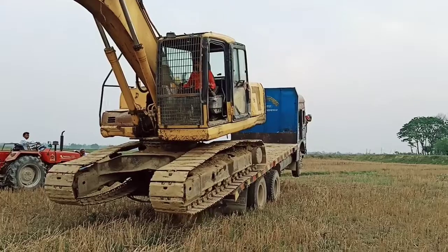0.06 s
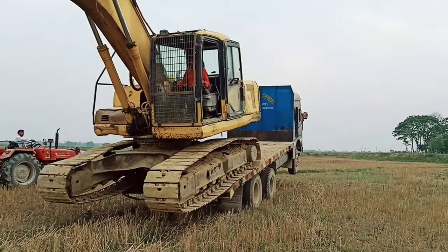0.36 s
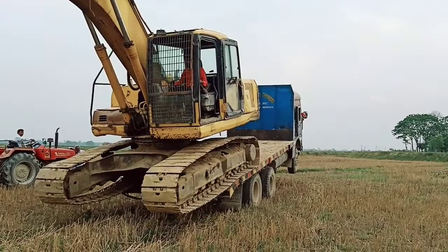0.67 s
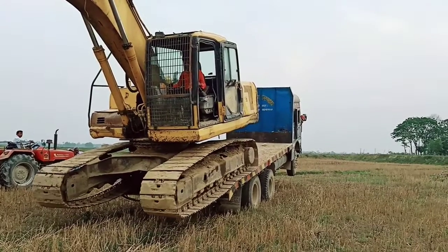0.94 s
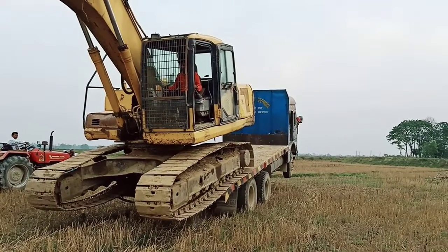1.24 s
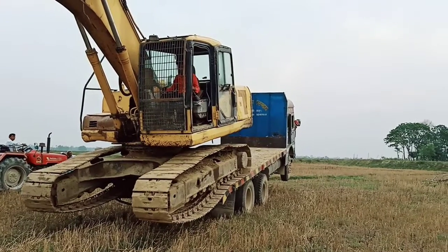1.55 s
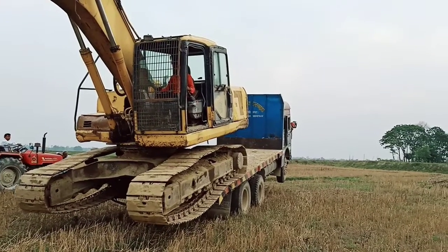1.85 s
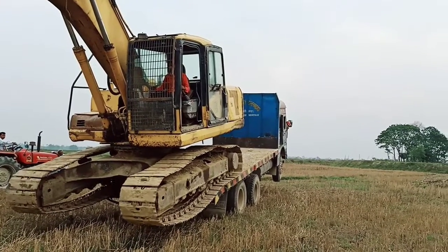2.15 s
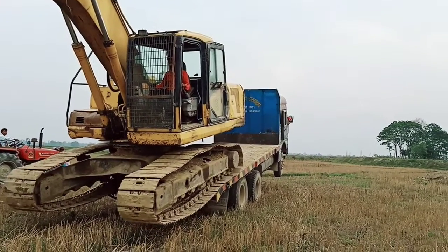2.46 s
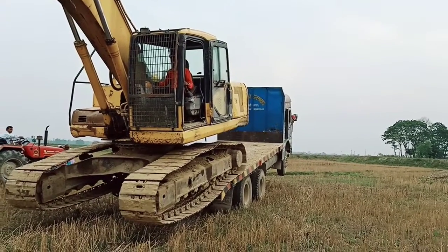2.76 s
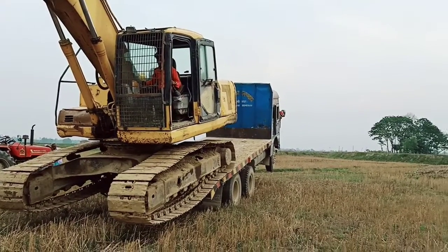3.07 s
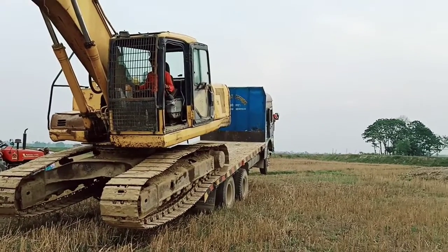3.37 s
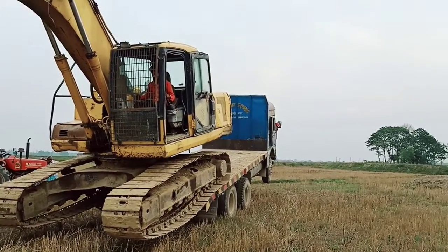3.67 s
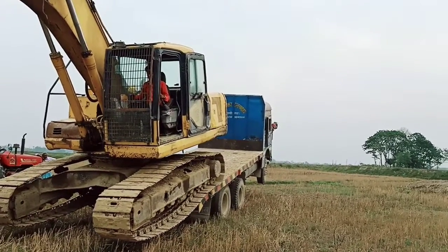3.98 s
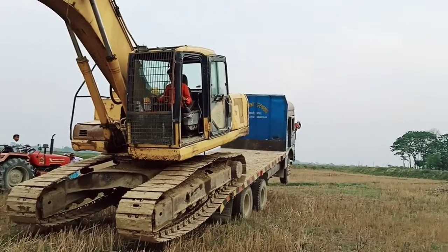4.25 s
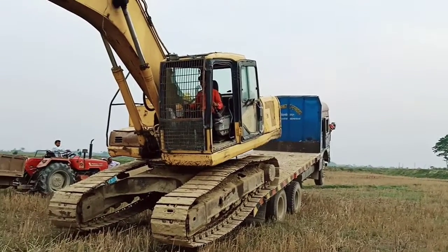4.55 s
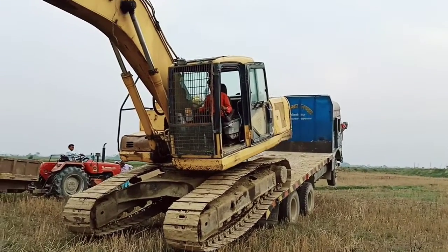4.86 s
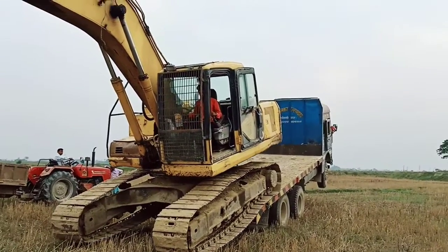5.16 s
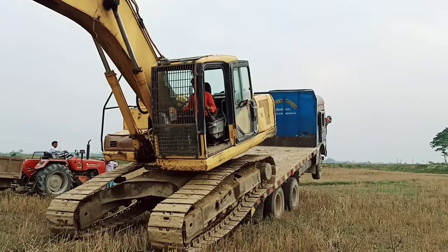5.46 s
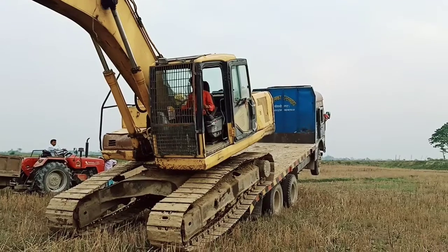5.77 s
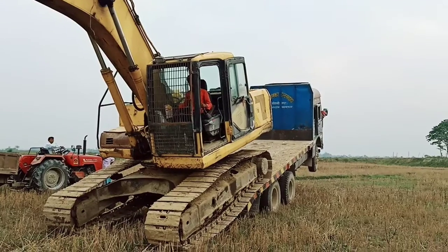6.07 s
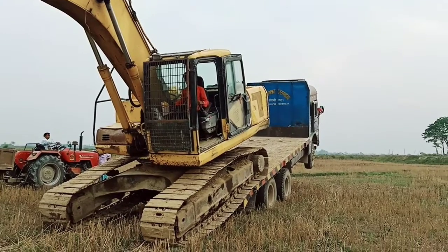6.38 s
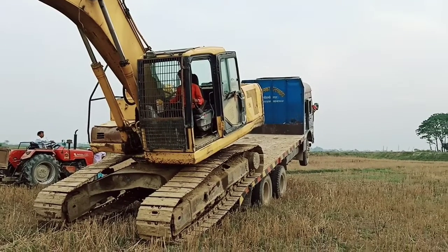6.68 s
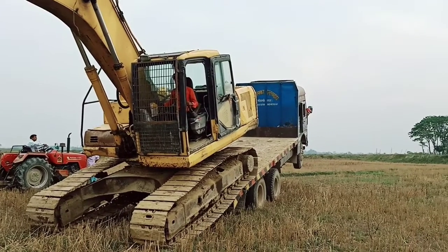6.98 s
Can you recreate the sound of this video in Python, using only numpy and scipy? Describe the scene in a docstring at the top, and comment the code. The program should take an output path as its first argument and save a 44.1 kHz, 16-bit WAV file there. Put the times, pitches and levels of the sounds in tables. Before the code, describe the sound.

A diesel excavator runs steadily with a faint hydraulic whine, a few metres away in an open field. For the first three seconds its steel tracks clank, squeak and groan over the edge of a trailer deck, which booms under the weight. Then the tracks fall quiet and the engine carries on, while dry stalks snap faintly underfoot and short puffs of wind knock on the hand-held microphone.

```python
"""Excavator creeping off a flatbed trailer

An open field, a hand-held phone a few metres from a diesel excavator standing a little to the right.
Its steel tracks grind, clank, squeak and groan over the edge of the deck, which booms under the weight.
Then it rests with the engine working and the hydraulic pump whining. Close by, dry stalks snap
underfoot and short puffs of wind knock on the two microphone ports."""
import sys
import numpy as np
from scipy import signal
from scipy.fft import rfft, irfft, next_fast_len
from scipy.io import wavfile
from scipy.ndimage import uniform_filter1d

SR = 44100
rng = np.random.default_rng(int(sys.argv[2]) if len(sys.argv) > 2 else 0)


def unload_audio(sound):
    """Save the sound as a 16-bit wav file, at the path given as the first command line argument."""
    columns = np.transpose(np.atleast_2d(sound))
    # keep every value between -1 and 1, then stretch to whole-number steps
    steps = np.round(np.clip(columns, -1, 1) * 32767)
    wavfile.write(sys.argv[1], SR, steps.astype(np.int16))


N = 309582
T = np.arange(N) / SR
BREEZE_FROM_S = 3.6

# how alike the two microphone ports hear a sound: frequency_hz, correlation
PORT_LIKENESS = [(60, 0.19), (240, 0.89), (950, 0.87), (1900, 0.14), (3800, 0.026)]
# gusts that swell and die away: centre_s, half_length_s, level_db, right_minus_left_db
WIND_GUSTS = [(4.193, 0.26, -35, -4), (4.543, 0.19, -37.5, -3.5), (5.3, .15, -43.5, 7), (6, 0.13, -36.5, 6),
              (6.892, 0.092, -37.5, 0)]
# strongest puffs on the microphone: centre_s, length_s, level_db, swing_hz, port (0 left, 1 right)
WIND_PUFFS = [(3.848, 0.013, -23.5, 210, 1), (3.883, 0.015, -24.5, 230, 1), (3.962, 0.0047, -22.5, 397, 1),
              (4.119, 0.0046, -13.5, 240, 1), (4.145, 0.013, -13.5, 496, 0), (4.173, 0.029, -22.5, 437, 0),
              (4.241, 0.017, -19.5, 383, 0), (4.278, 0.011, -19.5, 357.7, 0), (4.304, 0.023, -22, 263, 1),
              (4.364, 0.0087, -14, 237, 1), (4.435, 0.011, -21, 160, 0), (4.464, 0.011, -17, 230, 1),
              (4.537, 0.011, -25, 278, 0), (4.567, 0.0051, -24, 520, 1), (4.619, 0.007, -21, 190, 1),
              (4.674, 0.0044, -13.5, 458, 1), (4.74, 0.0088, -17.5, 203, 1), (4.986, 0.011, -12.5, 255, 1),
              (5.152, 0.0049, -22.5, 237, 0), (5.181, 0.011, -18, 249, 1), (5.209, 0.0048, -16, 540, 1),
              (5.235, 0.008, -18, 251, 1), (5.252, 0.013, -14, 294, 1), (5.32, 0.0072, -12.5, 418.3, 1),
              (5.515, 0.02, -21.5, 227, 1), (5.58, 0.0054, -18.5, 450, 1), (5.66, 0.006, -13, 287, 1),
              (5.786, 0.018, -21, 302, 1), (5.865, 0.0089, -16.5, 198.3, 1), (5.946, 0.0036, -11.5, 332, 1),
              (5.987, 0.0041, -18.5, 439, 0), (6.076, 0.0099, -20, 190.1, 1), (6.126, 0.0063, -19, 168, 1),
              (6.506, 0.013, -20, 278, 1), (6.925, 0.01, -21.5, 239.2, 1), (7.001, 0.02, -20.5, 216, 1)]
# dry stalks snapping underfoot: start_s, level_db
STALK_SNAPS = [(3.11, -50), (3.586, -47), (3.777, -51), (3.824, -55), (3.84, -46), (4.368, -49),
               (4.389, -53), (4.442, -47), (4.458, -45), (4.483, -44), (4.532, -46), (4.636, -53)]

# engine speed, held down while the tracks climb the edge, freed after the drop: time_s, firing_hz
ENGINE_SPEED = [(0, 74.27), (1.4, 74.72), (2.5, 75.62), (2.8, 79.8), (3.7, 78.88), (4.2, 79.38),
                (4.55, 76.87), (5.15, 76.06), (5.6, 77.64), (7.02, 79.7)]
# the engine as heard at the phone: time_s, body_db, clatter_db
ENGINE_LEVELS = [(0, -37, -42), (1.3, -42.5, -46.5), (3.1, -40, -46.5), (4.1, -38, -43.5),
                 (7.02, -36.5, -43.5)]
# engine and pump tones: multiple of the firing rate, level_db, wander_db
ENGINE_PUMP_TONES = [(1, -50, 5), (2, -58, 2.5), (4, -61, 3), (6, -69.5, 7), (15, -77, 2), (24, -68, 11),
                     (30, -71.5, 2)]
# cooling fan tones: multiple of the blade rate, level_db, wander_db
FAN_TONES = [(1, -46.5, 0.5), (2, -63, 5), (3, -51.5, 1.5), (5, -65.5, 3.5)]
# colour of the exhaust and engine body: frequency_hz, gain_db
BODY_COLOUR = [(25, -29), (55, -8), (75, 9), (110, -3), (170, 0.5), (230, -3.5), (300, -8.5), (430, -13.5),
               (570, -8), (670, -3.5), (790, -4), (1000, -17), (1430, -30), (2400, -100)]
# colour of the mechanical clatter: frequency_hz, gain_db
CLATTER_COLOUR = [(590, -27), (1000, -16.5), (1150, -0.5), (1290, 0), (1590, -5.5), (1870, -2), (2330, 0),
                  (2490, -4), (3590, -16), (3850, -11.5), (4510, -15), (5180, -10.5), (5950, -18.5),
                  (7330, -32), (8000, -51.5), (10400, -74), (17600, -120)]

# the machine's weight dropping on the deck: start_s, level_db
DECK_DROPS = [(0.241, -28), (0.284, -24.5), (0.346, -28.5), (0.432, -28), (0.456, -28.5), (0.543, -35.5),
              (0.79, -32.5), (1.043, -35), (1.181, -35), (1.252, -33), (1.531, -24.5), (1.744, -35),
              (2.423, -23.5), (2.453, -21), (2.474, -23)]
# bending modes of the deck: pitch_hz, level_db, t60_s
DECK_MODES = [(87, -5, 0.22), (113.8, 1, 0.21), (143, 3, 0.29), (185.4, -4.5, 0.18), (215, 5, 0.12),
              (254.3, 0, 0.17), (306.3, 0, 0.12)]
# dry track pins: start_s, length_s, pitch_hz, level_db, roughness (0-1), right_minus_left_db
PIN_SQUEAKS = [(0.033, 0.057, 4652, -37, 0.3, -8), (0.152, 0.049, 1304, -34, 0.7, 2),
               (0.161, 0.062, 1587, -36.5, 1.05, 0), (0.163, 0.04, 2436, -30.5, 0.73, 9),
               (0.164, 0.06, 2760, -33.5, 0.95, 3), (0.679, 0.04, 3500, -40.5, 0.24, 8),
               (0.779, 0.031, 5060, -35.5, 0.47, 6), (0.792, 0.074, 2333, -32, 0.78, 4),
               (.839, 0.0035, 5240, -17.5, 0.03, 6), (.84, 0.005, 5890, -26.5, 0.1, 1),
               (0.834, 0.018, 2750, -34.5, 0.5, -2.5), (0.989, 0.008, 5870, -32, 0, 3),
               (0.986, 0.093, 2455, -36.5, 0.91, 3.5), (0.99, 0.084, 5090, -38, 0.75, 2),
               (1.166, 0.06, 2650, -41.5, 0.9, 2), (1.165, 0.15, 3940, -42.5, 0.93, 0),
               (1.241, 0.046, 4080, -41, 0.85, -1), (1.243, 0.05, 3400, -40, 1, 3),
               (1.412, 0.038, 1790, -48, 0.3, 0), (1.726, 0.011, 3520, -24.5, 0, 5.5),
               (1.723, 0.032, 5380, -36.5, 0.7, 4), (1.752, 0.0065, 3530, -26, 0.07, 1),
               (2.293, 0.0089, 3500, -46, 0.2, -1), (2.397, 0.018, 3660, -41.5, 0, 3),
               (2.428, 0.054, 3314, -24, 0.8, 1), (2.426, 0.06, 4380, -34.5, 0.8, -1),
               (2.56, 0.019, 3570, -42.5, 0.3, -3), (2.62, 0.029, 2850, -35, 0.63, 2),
               (2.66, 0.043, 2222, -36.5, 0.47, 2), (5.221, 0.14, 2290, -52.5, 0, 7)]
# track sliding on the deck edge, one list a groan; pitch and strength follow the load on the shoe:
# time_s, pitch_hz, level_db, roughness (0-1), overtone_lift_db
TRACK_GROANS = [
    [(.643, 725, -42, 0.04, -11), (.665, 715, -18, .1, -5), (.682, 706, -10, 0.2, -7.5),
     (.705, 692, -14.5, 0.23, 1.5), (.737, 707, -8, 0.22, -3), (.772, 738.4, -14, 0.13, -4),
     (.796, 702, -7.5, 0, -7), (.807, 693, -15.5, .8, -10.5), (.823, 706, -7.5, 0.44, 1),
     (.846, 695, -15, 0.8, -1), (.869, 716, -15.5, 0.15, 2), (.885, 702, -24.5, .8, 7),
     (.9, 709.6, -16.5, 0, 3.5), (.921, 668, -35.5, 1, 9), (.94, 687, -24, 0.55, -3),
     (.985, 658, -50, 0.6, -1)],
    [(1.485, 645, -48, .4, -5), (1.515, 661, -33.5, 0.65, -10), (1.545, 720, -28.5, 0.65, 3),
     (1.592, 728, -27, 0.67, -8), (1.625, 740, -42.5, .8, -8)],
    [(2.6, 866, -47, .8, 0), (2.635, 825, -27, 0.92, -2), (2.655, 728, -24, .7, 8),
     (2.671, 733, -13.5, 0.33, 0), (2.687, 735, -17, 0.7, 0), (2.7, 738, -26.5, 0.4, 5),
     (2.73, 745, -27.5, 0.9, -4), (2.78, 726, -48, .8, 2)],
]
# overtones of a groan: multiple of the fundamental, relative_db
GROAN_OVERTONES = [(2, -18.5), (3, -26), (4, -32), (5, -38.5)]
# single hard blows of a track shoe: start_s, level_db, contact_hz
SHOE_STRIKES = [(0.268, -43, 2600), (0.276, -41, 650), (0.296, -41, 500), (0.334, -45, 1310),
                (0.347, -29, 644), (0.429, -34, 900), (0.441, -29, 646), (0.454, -30.5, 1990),
                (0.47, -33, 520), (0.545, -38, 380), (0.79, -28.5, 1470), (0.987, -35.5, 1970),
                (1.169, -45, 3624), (2.241, -28, 1170), (2.422, -29, 800), (2.426, -32.5, 4400),
                (2.436, -28, 3600), (2.448, -28, 704), (2.473, -19.5, 600), (2.606, -37.5, 1000),
                (2.776, -38.5, 1740)]
# modes of a track shoe: pitch_hz, level_db, t60_s
SHOE_MODES = [(640, 8, 0.13), (784.4, 3, 0.24), (924, 2, 0.059), (1203, -3.5, 0.17), (1386, -9, 0.35),
              (2230, 9, 0.077), (2780, -15, 0.11), (3230, -15, 0.14), (3280, -22.5, 0.079),
              (3650, -10.5, 0.13), (3780, 3, 0.049), (4280, 0, 0.13), (5460, -2, 0.15)]
# shoes grinding and rattling on the deck: start_s, length_s, level_db, hardness_db
TRACK_CLANKS = [(0, 0.084, -35.5, 8.5), (0.149, 0.069, -34, 7), (0.225, 0.1, -36.5, 3.5),
                (0.27, 0.015, -33.5, -0.5), (0.331, 0.046, -36, -0.5), (0.428, 0.044, -34, 0.5),
                (0.502, 0.077, -43.5, 0), (0.687, 0.081, -40, 9), (0.787, 0.097, -35, 3),
                (0.987, 0.022, -42.5, 6.5), (1.038, 0.034, -39.5, 4), (1.169, 0.065, -37, 3),
                (1.242, 0.033, -39, 7.5), (1.523, 0.098, -39.5, -2.5), (1.724, 0.034, -42, 8),
                (2.243, 0.018, -36.5, 2.5), (2.295, 0.27, -43, 1), (2.419, 0.11, -27, 8),
                (2.475, 0.029, -34.5, -7), (2.602, 0.1, -32.5, 4.5), (2.778, 0.054, -43.5, 5)]
# four registers of the steelwork: low_hz, high_hz, t60_s, level_db, share of the hardness gained
STEEL_REGISTERS = [(73.5, 423, 0.42, 2.5, -0.31), (480, 980, 0.29, 3, -1.1), (1310, 2380, 0.36, -4, -0.26),
                   (2800, 26000, 0.21, -11, 1)]
# broad colour of the struck deck and tracks: frequency_hz, gain_db
STEEL_COLOUR = [(29, -41.5), (50, -25), (130, -1), (300, 3), (375, -11), (490, -13), (626, -2.5),
                (842, -4.5), (1040, -23.5), (1230, -24.5), (1890, -23.5), (2330, -15.5), (5460, -18.5),
                (7350, -32.5), (8000, -59.5), (10400, -76.5), (17600, -120)]
# resonances added to that colour: centre_hz, width_hz, relative_db
STEEL_PEAKS = [(624, 110, 0), (1350, 280, 3), (2110, 84, 5), (3335, 30, -8.5), (3680, 37, -1.5),
               (4280, 42, 7.5), (5170, 92, 7), (5570, 74, 10)]


def undb(db):
    """Decibels to gain."""
    return 10 ** (np.asarray(db) / 20)


def rms(x):
    """Root mean square."""
    return np.sqrt(np.mean(np.abs(x) ** 2) + 1e-20)


def unit(x):
    """Scale to rms 1."""
    return x / rms(x)


def pan(right_db):
    """Gains of the two ports, the right one right_db above the left."""
    return undb(np.array([[-right_db], [right_db]]) / 2)


def curves(table):
    """The columns of a timed table, sample by sample."""
    times, *columns = np.transpose(table)
    return [np.interp(T, times, column) for column in columns]


def along(points, hz):
    """Read (frequency_hz, value) points on a log-frequency axis."""
    points_hz, values = np.transpose(points)
    return np.interp(np.log(hz), np.log(points_hz), values)


def shape(x, gain):
    """Filter by a gain that is a function of frequency."""
    n = x.shape[-1]
    size = next_fast_len(n + 2048)
    hz = np.maximum(np.arange(size // 2 + 1) * SR / size, 1)
    return irfft(rfft(x, size) * gain(hz), size)[..., :n]


def band(x, low_hz, high_hz, order=3):
    """Causal band-pass."""
    sos = signal.butter(order, [low_hz, min(high_hz, SR * .45)], "band", fs=SR, output="sos")
    return signal.sosfilt(sos, x)


def walk(rate_hz, size=N):
    """Smooth random drift with spread near 1."""
    hold = max(int(SR / rate_hz), 2)
    steps = rng.standard_normal(4096)[np.arange(size) // hold % 4096]
    return unit(uniform_filter1d(uniform_filter1d(steps, hold), hold))


def fade(size, t60):
    """Exponential decay, 60 dB down after t60 seconds."""
    return np.exp(-np.log(1000) * np.arange(size) / SR / t60)


def port_noise(size):
    """Noise at the two ports: alike in the low mids, unrelated in the treble."""
    mid, side = rng.standard_normal((2, size))
    mid = shape(mid, lambda hz: np.sqrt(1 + along(PORT_LIKENESS, hz)))
    side = shape(side, lambda hz: np.sqrt(1 - along(PORT_LIKENESS, hz)))
    return mid + np.array([side, -side])


def breeze(level_db=-59, right_db=5.5, rise_s=0.26, patchy_db=5):
    """A light air gets up, with a few gusts on top; it flutters patchily on each port."""
    risen = np.clip((T - BREEZE_FROM_S) / rise_s, 0, 1)
    out = np.zeros((2, N))
    for port, side in enumerate((-.5, .5)):
        strength = risen * undb(level_db + side * right_db)
        for centre_s, half_s, gust_db, gust_right_db in WIND_GUSTS:
            strength += np.exp(-((T - centre_s) / half_s) ** 2) * undb(gust_db + side * gust_right_db)
        flutter = rng.standard_normal(N) * undb(patchy_db * walk(70))
        out[port] = strength * unit(band(flutter, low_hz=70, high_hz=420, order=2))
    return out


def small_eddies(per_s=5.5, length_s=0.0077, level_db=-25, scatter_db=6, swing_hz=238, right_share=.7):
    """Weak puffs come at random once the breeze is up; rows as in WIND_PUFFS."""
    return [(BREEZE_FROM_S + (k + when) / per_s, length_s, level_db + scatter_db * (force - .5),
             swing_hz, int(side < right_share))
            for k, (when, force, side) in enumerate(rng.random((64, 3)))]


def wind_puffs(trim_db=-1.46, floor_hz=85, ceiling_hz=950):
    """Eddies hit one microphone port at a time as short dull knocks."""
    size = 4096
    out = np.zeros((2, N + size))
    t = (np.arange(size) - size // 2) / SR
    dull = lambda hz: 1 / np.sqrt((1 + (hz / ceiling_hz) ** 14) * (1 + (floor_hz / hz) ** 4))
    for centre_s, length_s, db, swing_hz, port in WIND_PUFFS + small_eddies():
        if centre_s > T[-1]:
            continue
        # the pressure swings a few times, steeply, at the peak of the eddy
        pressure = unit(band(rng.standard_normal(size), 0.3 * swing_hz, 1.37 * swing_hz, order=2))
        eddy = np.tanh(2 * pressure) * np.exp(-2 * (t / length_s) ** 2)
        knock = unit(shape(eddy, dull)) * np.sqrt(length_s * SR / size)
        start = int(centre_s * SR) - size // 2
        out[port, start:start + size] += undb(db + trim_db) * knock
    return out[:, :N]


def stubble():
    """Each dry stalk breaks close to the phone with one fine, crisp tick."""
    size = SR // 20
    out = np.zeros((2, N))
    for start_s, db in STALK_SNAPS:
        tick = band(port_noise(size) * fade(size, t60=0.0087), low_hz=4800, high_hz=6200, order=2)
        start = int(start_s * SR)
        out[:, start:start + size] += undb(db) * tick / rms(tick[:, :SR // 400])
    return out


def pump_and_fan(firings, blades_per_firing=2.842):
    """Engine hum, pump whine and fan tones follow the engine speed, each fluttering on its own."""
    out = np.zeros(N)
    for tones, turns in (ENGINE_PUMP_TONES, firings), (FAN_TONES, firings * blades_per_firing):
        for multiple, db, wander_db in tones:
            flutter = 1 + .35 * (walk(30) + 1j * walk(30))
            tone = np.sqrt(2) * np.imag(flutter * np.exp(2j * np.pi * multiple * turns))
            out += undb(db + wander_db * np.tanh(walk(4.29))) * tone
    return out


def engine(throb=0.078, knock=0.056, repeat_share=0.36, speed_wander=0.001444):
    """Six cylinders pulse the exhaust and clatter and drive the pump and fan."""
    firing_hz = curves(ENGINE_SPEED)[0] * (1 + speed_wander * walk(9))
    firings = np.cumsum(firing_hz) / SR
    beat = np.cos(2 * np.pi * firings)
    cylinder_gain = undb(.5 * rng.standard_normal(6))[firings.astype(int) % 6]
    # part of the noise repeats with every cycle of six firings
    size = 3456
    position = firings / 6 % 1 * size
    cycle = np.array([np.interp(position, np.arange(size), noise) for noise in port_noise(size)])
    drive = (np.sqrt(1 - repeat_share) * port_noise(N) + np.sqrt(repeat_share) * cycle) * cylinder_gain
    body = unit(shape(drive * (1 + throb * beat), lambda hz: undb(along(BODY_COLOUR, hz))))
    clatter = unit(shape(drive * (1 + knock * beat), lambda hz: undb(along(CLATTER_COLOUR, hz))))
    body_db, clatter_db = curves(ENGINE_LEVELS)
    body *= undb(body_db)
    clatter *= undb(clatter_db + .5 * walk(5.8)) * pan(right_db=1.5)
    return body + clatter + pump_and_fan(firings)


def steel_gain(hz):
    """Response of the steelwork: a broad colour with a few strong resonances."""
    peaks = sum(undb(db) ** 2 / (1 + (2 * (hz - centre_hz) / width_hz) ** 2)
                for centre_hz, width_hz, db in STEEL_PEAKS)
    return undb(along(STEEL_COLOUR, hz)) * np.sqrt(1 + peaks)


def struck_spot(hz, ripple_db=4, spacing_hz=110):
    """Response of the steelwork at a random spot: some groups of modes answer more than others."""
    ripple = np.interp(hz / spacing_hz, np.arange(200), ripple_db * rng.standard_normal(200))
    return steel_gain(hz) * undb(ripple * np.minimum(hz / 1500, 1))


def frame_ring(x, t60, wet_db):
    """Add the diffuse ringing of the steel frame, which differs at each port."""
    size = SR // 2
    tail = unit(port_noise(size) * fade(size, t60)) / np.sqrt(size)
    return x + undb(wet_db) * signal.fftconvolve(x[None], tail, axes=1)[:, :len(x)]


def deck_booms(push_s=0.007, detune=0.094):
    """The long deck booms in its bending modes; each drop loads another spot and shifts their pitch."""
    size = SR // 2
    out = np.zeros(N)
    t = np.arange(size) / SR
    for start_s, db in DECK_DROPS:
        boom = np.zeros(size)
        for hz, mode_db, t60 in DECK_MODES:
            grip, turn, shift = rng.random(3)
            loaded_hz = hz * (1 + detune * (shift - .5))
            strength = undb(mode_db) * (1 + (grip - .5) / 2)
            boom += strength * fade(size, t60) * np.sin(2 * np.pi * (loaded_hz * t + turn))
        start = int(start_s * SR)
        out[start:start + size] += undb(db) * boom * (1 - np.exp(-t / push_s))
    return frame_ring(out, t60=0.33, wet_db=-8) * pan(right_db=-1.4)


def slips(size, per_s, t60, scatter_db=5.5):
    """Tiny slips of uneven strength, each ringing briefly in a phase of its own."""
    kicks = (rng.random(size) < per_s / SR) * undb(scatter_db * rng.standard_normal(size))
    kicks = uniform_filter1d(kicks * np.exp(2j * np.pi * rng.random(size)), size=12)
    decay = np.exp(-np.log(1000) / t60 / SR)
    return unit(signal.lfilter([1], [1, -decay], kicks))


def chatter(depth, rate_hz, size, limiting=0.53, catch_db=-9):
    """Uneven slipping with sharp catches wobbles the phase; friction limits the swing in strength."""
    drift = (walk(rate_hz, size) + 1j * walk(rate_hz, size)) / np.sqrt(2)
    catches = undb(catch_db) * slips(size, per_s=350, t60=0.017)
    wobble = (1 + depth * (drift + catches)) / np.sqrt(1 + depth ** 2)
    return wobble / (np.abs(wobble) + 1e-9) ** limiting


def pin_squeaks(t60=0.017, rise_s=0.0011, waver=0.012):
    """A dry pin sings for a moment at one pitch, cleanly or scratchily, then rings off."""
    size = SR // 4
    out = np.zeros((2, N))
    t = np.arange(size) / SR
    attack = 1 - np.exp(-t / rise_s)
    for start_s, length_s, hz, db, rough, right_db in PIN_SQUEAKS:
        rough = np.clip(rough, 0, 1)
        turns = hz * np.cumsum(1 + waver * rough * walk(250, size)) / SR
        scratch = np.sqrt(1 - rough ** 2) + rough * slips(size, per_s=1100, t60=.006)
        tone = np.sqrt(2) * np.real(scratch * np.exp(2j * np.pi * turns))
        release = np.exp(-np.log(1000) * np.maximum(t - length_s, 0) / t60)
        squeak = frame_ring(tone * attack * release, t60=0.13, wet_db=-8)
        start = int(start_s * SR)
        out[:, start:start + size] += undb(db) * squeak * pan(right_db)
    return out


def track_groans(jitter=.02, rasp_db=-19, chatter_hz=110):
    """Steel on steel makes a stick-slip tone: it swells with load, rasps, and breaks up on release."""
    def harmonic(multiple, phase, rough):
        wobble = chatter(rough * multiple, chatter_hz * np.sqrt(multiple), len(phase))
        return np.sqrt(2) * np.real(wobble * np.exp(1j * multiple * phase))

    out = np.zeros(N)
    for groan in TRACK_GROANS:
        sliding = (T > groan[0][0]) & (T < groan[-1][0])
        hz, db, rough, lift_db = (curve[sliding] for curve in curves(groan))
        size = len(hz)
        phase = 2 * np.pi * np.cumsum(hz * (1 + jitter * rough * walk(90, size))) / SR
        grit = unit(band(shape(rng.standard_normal(size), steel_gain), low_hz=1300, high_hz=4200))
        rasp = undb(rasp_db) * rough * grit * (1 + np.cos(phase))  # one burst a slip
        overtones = sum(undb(tone_db) * harmonic(multiple, phase, rough)
                        for multiple, tone_db in GROAN_OVERTONES)
        out[sliding] += undb(db) * (harmonic(1, phase, rough) + undb(lift_db) * (overtones + rasp))
    return frame_ring(out, t60=0.31, wet_db=-20)


def shoe_strikes(spread_octaves=0.77):
    """A shoe slaps down: a crack and the ring of the plate, strongest near a pitch the contact sets."""
    size = SR // 2
    out = np.zeros((2, N))
    t = np.arange(size) / SR
    for start_s, db, contact_hz in SHOE_STRIKES:
        contact = lambda hz: np.exp(-.5 * (np.log2(hz / contact_hz) / spread_octaves) ** 2)
        plate = np.zeros((2, size))
        for hz, mode_db, t60 in SHOE_MODES:
            turn = rng.random((2, 1))
            # the low modes reach both ports in phase, the high ones do not
            phase = 2 * np.pi * (hz * t + turn[0] + turn * (hz > 1000))
            plate += undb(mode_db) * contact(hz) * fade(size, t60) * np.sin(phase)
        crack = unit(shape(port_noise(size), contact)) * fade(size, t60=.06)
        start = int(start_s * SR)
        out[:, start:start + size] += undb(db) * (plate / rms(plate[:, :SR // 50]) + crack)
    return out


def track_clanks(hits_per_s=450, scatter_db=5, first_blow=3, rise_share=0.029):
    """Each slip of the track sends a blow and a rattle into the steel; hard contact favours treble."""
    size = SR // 2
    out = np.zeros((2, N + size))
    t = np.arange(size) / SR
    for start_s, length_s, db, hardness_db in TRACK_CLANKS:
        hits = (rng.random(size) < hits_per_s / SR) * undb(scatter_db * rng.standard_normal(size))
        rattle = hits * (t < length_s) * np.exp(-t / length_s)
        rattle[0] = first_blow
        modes = shape(port_noise(size), struck_spot)
        swell = 1 - np.exp(-t / (rise_share * length_s))  # longer grinds start more softly
        start = int(start_s * SR)
        for low_hz, high_hz, t60, register_db, share in STEEL_REGISTERS:
            ringing = signal.fftconvolve(rattle[None], modes * fade(size, t60), axes=1)[:, :size]
            clank = band(swell * ringing, low_hz, high_hz)
            clank /= rms(clank[:, :int(length_s * SR)].mean(axis=0))
            clank *= pan(right_db=2 if low_hz > 1000 else -1.2)  # the bright parts face the right port
            out[:, start:start + size] += undb(db + register_db + share * hardness_db) * clank
    return out[:, :N]


def from_right(x, lag_s):
    """Sound from the right reaches the left port a moment later."""
    left = shape(x[0], lambda hz: np.exp(-2j * np.pi * hz * lag_s))
    return np.array([left, x[1]])


def scene():
    """The machine stands a few metres off, a little to the right; stubble and wind are at the phone."""
    machine = engine() + track_clanks() + shoe_strikes() + deck_booms() + track_groans() + pin_squeaks()
    return from_right(machine, lag_s=.00005) + stubble() + breeze() + wind_puffs()


def record(dry):
    """The phone thins the deep bass and cuts the top."""
    bass_hz, top_hz = 40, 7900
    thinned = signal.sosfilt(signal.butter(2, bass_hz, "high", fs=SR, output="sos"), dry)
    return signal.sosfilt(signal.ellip(10, .2, 80, top_hz, fs=SR, output="sos"), thinned)


dry = scene()
out = record(dry)
unload_audio(out)
```